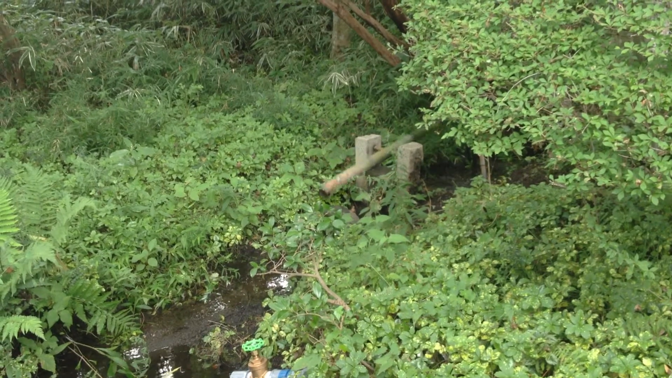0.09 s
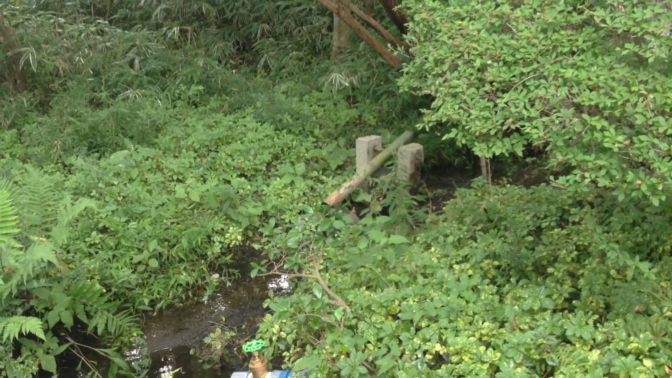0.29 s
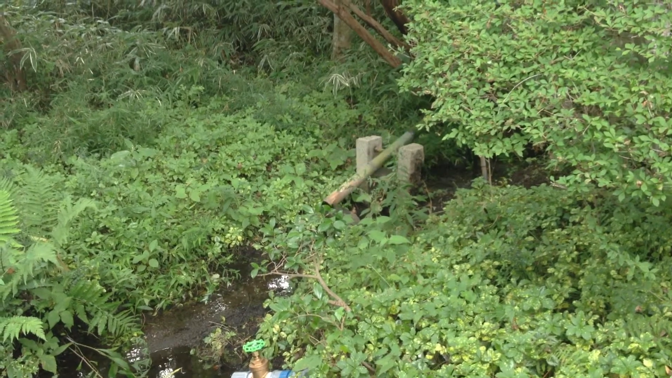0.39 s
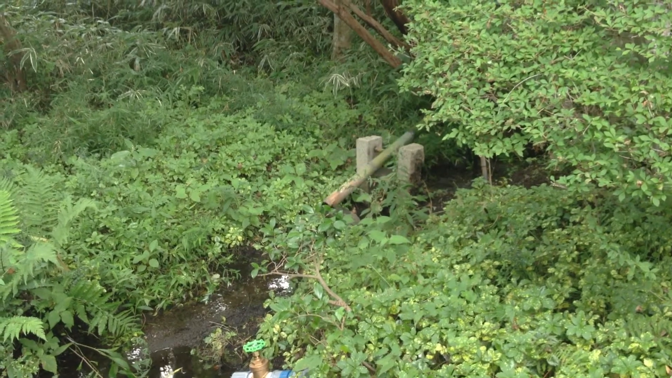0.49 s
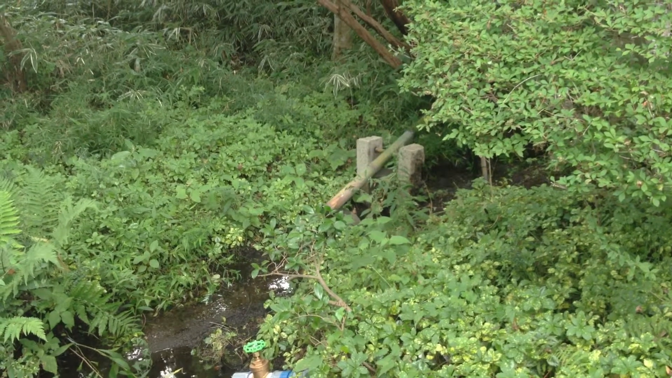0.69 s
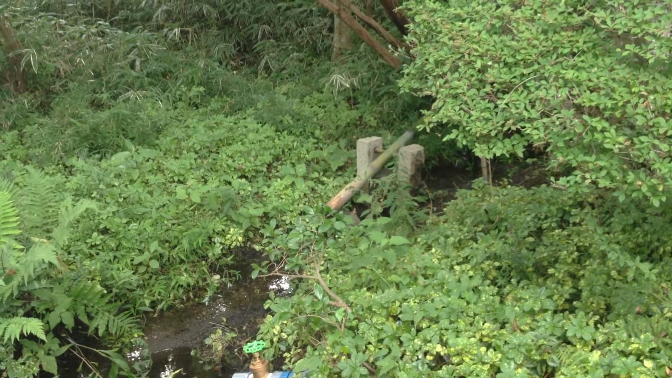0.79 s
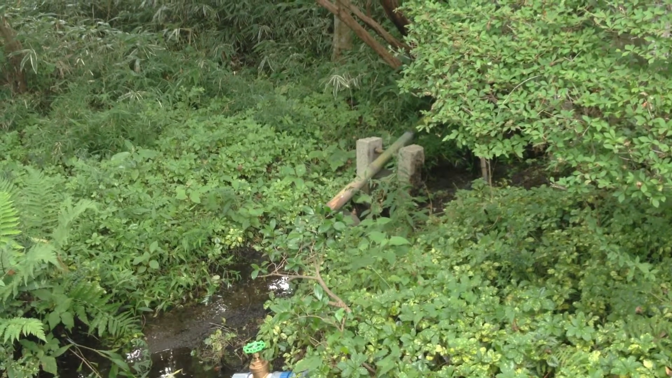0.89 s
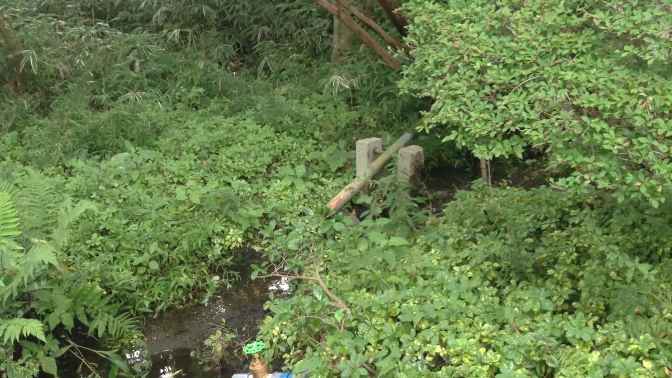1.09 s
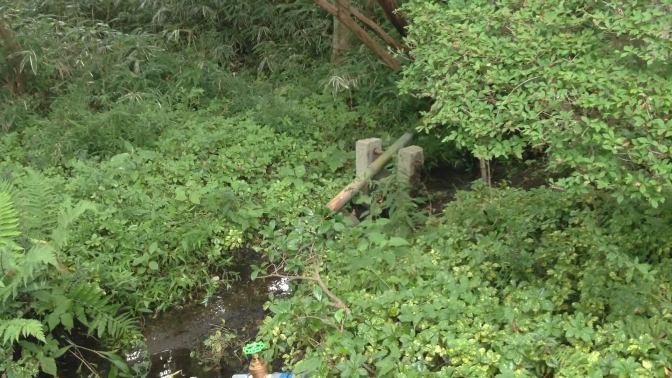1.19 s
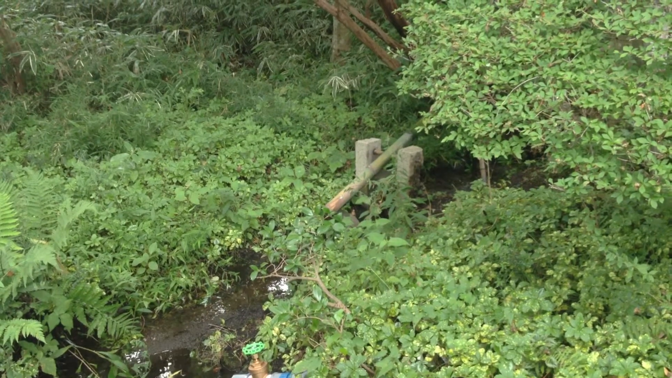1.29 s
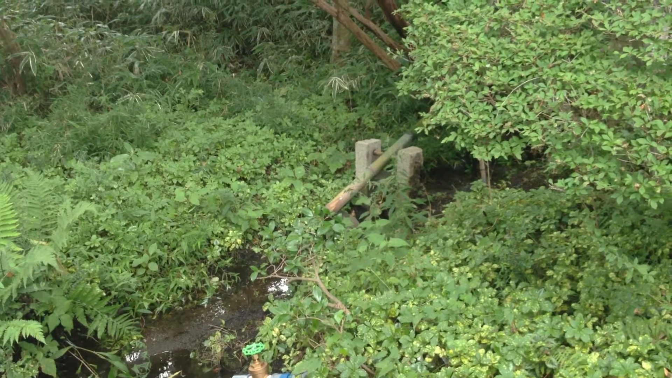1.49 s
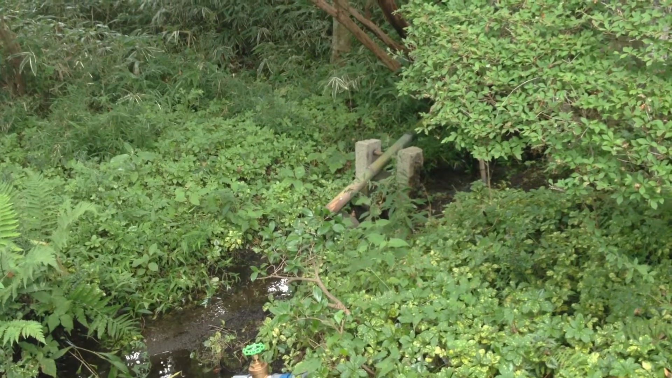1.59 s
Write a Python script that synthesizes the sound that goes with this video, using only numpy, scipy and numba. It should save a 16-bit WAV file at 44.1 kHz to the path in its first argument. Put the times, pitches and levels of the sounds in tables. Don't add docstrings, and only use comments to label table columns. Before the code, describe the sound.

A hollow bamboo tube strikes stone at about 0.25 seconds: a bright, cracking, woody clack of several contacts within 0.03 seconds, with short ringing and dull echoes from banks and leaves. A much softer bounce patters around 0.67-0.72 seconds. Throughout, a raspy cicada slides up and down in pitch about three times in a quarter second, over distant insect hiss, faint trickling and small drips, clearest near 0.57.

```python
import sys
import numpy as np
from scipy import signal
from scipy.io import wavfile
from scipy.ndimage import uniform_filter1d
from numba import njit

SR = 44100
rng = np.random.default_rng(int(sys.argv[2]) if len(sys.argv) > 2 else 0)


def boost(x):
    u = np.asarray(x, float) / 20
    return 10 ** u


def waveform_to_disk(signal):
    frames = np.transpose(np.atleast_2d(signal))
    scaled = np.clip(frames, -1, 1) * 32767
    samples = np.round(scaled).astype(np.int16)
    wavfile.write(sys.argv[1], SR, samples)


N = 70560


@njit
def moving_band(x, hz, width):
    y, band_state, low_state = np.empty(len(x)), 0., 0.
    for i in range(len(x)):
        w = 2 * np.pi * hz[i] / SR
        g = np.tan(w / 2)
        k = 2 * np.pi * width / SR / np.sin(w)
        v = (band_state + g * (x[i] - low_state)) / (1 + g * (g + k))
        band_state = 2 * v - band_state
        low_state = low_state + 2 * g * v
        y[i] = k * v
    return y


def band(x, hz, width, count=1):
    for _ in range(count):
        x = moving_band(x + 1e-18, hz + np.zeros(len(x)), float(width))
    return x


def noise_band(hz, width, count):
    return unit(band(rng.standard_normal(N), hz, width, count))


def unit(x):
    return x / np.sqrt(np.mean(x ** 2))


def unit_energy(x):
    return x / np.sqrt(np.sum(x ** 2))


def fade(t, t60):
    return np.exp(-np.log(1000) * t / t60)


def walk(rate):
    hold = int(SR / rate)
    steps = np.repeat(rng.standard_normal(N // hold + 1), hold)
    smooth = uniform_filter1d(uniform_filter1d(steps, hold), hold)
    return unit(smooth[:N])


def add(out, x, s):
    i = int(s * SR)
    out[i:i + len(x)] += x[:len(out) - i]


# (frequency [Hz], level [dB], t60 [s])
BAMBOO_MODES = [(243.8, -17.5, 0.74), (396.9, -14.5, 0.23), (606.3, -2.5, 0.044), (739, -13, 0.32),
                (1058, -1, 0.074), (1194, -0.5, 0.066), (1284, 0, 0.059), (1407, -4, 0.049),
                (1732, -2, 0.056), (2180, 1, 0.046), (2277, -1.5, 0.043), (2552, -2.5, .04),
                (2878, -9, 0.06), (3308, -8, 0.04)]


def bamboo_ring(t, hollow_db):
    hz, db, t60 = np.array(BAMBOO_MODES).T[:, :, None]
    level_luck, pitch_luck = rng.standard_normal((2, len(hz), 1))
    level = boost(db + 2.5 * level_luck + hollow_db * (hz < 1100))
    pitch = hz * (1 + .015 * pitch_luck * (t60 < .15))
    return (level * fade(t, t60) * np.sin(2 * np.pi * pitch * t)).sum(axis=0) / 3


# (frequency [Hz], width [Hz], level [dB])
CRACK_BANDS = [(1530, 2200, 7), (3600, 1100, 0.5), (6720, 1330, 3.5), (11900, 7000, -6)]


def cane_crack(t):
    hiss = rng.standard_normal(len(t))
    crack = sum(boost(db) * unit(band(hiss, hz, width, count=2)) for hz, width, db in CRACK_BANDS) / 3
    rise_s, t60_s = 0.0013, 0.049
    return crack * fade(t, t60_s) * (1 - np.exp(-t / rise_s))


# (time [s], level [dB], crack level [dB], hollow low modes [dB])
CONTACTS = [(.2465, -14, 0, 0.5), (.2485, -15, -2, 3), (0.2501, -6, -24, -0.5), (0.2547, -14.5, 7, -2),
            (.2605, -10.5, -11.5, 1.5), (.2665, -13, -13, 0), (.2725, -22.5, -12, 6),
            (.6735, -23, -22, 5.5), (.6768, -32.5, -31, 5.5), (.686, -52, -13, -3), (.696, -27.5, -7, 1),
            (.707, -33, -14, 3.5), (0.717, -41, -20, 8)]


def tube():
    out, t = np.zeros(N), np.arange(SR // 2) / SR
    thud_hz, thud_db, thud_t60_s, push_s = 212, -27.5, 0.022, .0004
    thud = boost(thud_db) * fade(t, thud_t60_s) * np.sin(2 * np.pi * thud_hz * t)
    for s, level_db, crack_db, hollow_db in CONTACTS:
        knock = bamboo_ring(t, hollow_db) + boost(crack_db) * cane_crack(t) + thud
        add(out, boost(level_db) * knock * (1 - np.exp(-t / push_s)), s)
    return out


# (delay [s], level [dB], smear [s], top frequency [Hz])
ECHOES = [(0.0459, -19.5, 0.0022, 6600), (0.109, -26.5, 0.0011, 2240), (0.0589, -28, 0.0033, 2050),
          (0.131, -34, 0.0059, 2640)]
# (frequency [Hz], level [dB], t60 [s])
FOLIAGE = [(300, -13.5, 0.73), (1000, -28.5, .3), (2550, -13.5, 0.42), (6250, -14, 0.27), (12000, -7.5, .2)]


def surroundings(x):
    t = np.arange(SR // 2) / SR
    response = (t == 0) * 1.
    for delay, db, smear, top_hz in ECHOES:
        clump = band(rng.standard_normal(len(t)), top_hz / 2, top_hz)
        clump = clump * np.exp(-.5 * ((t - delay) / smear) ** 2)
        response = response + boost(db) * unit_energy(clump)
    for hz, db, t60 in FOLIAGE:
        tail = band(rng.standard_normal(len(t)), hz, hz)
        tail = tail * fade(t, t60) * (1 - np.exp(-t / .004))
        bandwidth_gain = np.sqrt(hz / SR * np.pi)
        response = response + boost(db) * unit_energy(tail) * bandwidth_gain
    return signal.fftconvolve(x, response)[:N]


# (time [s], count [strokes])
STROKES = [(-.048, -1), (.041, 0), (.219, 2), (.483, 5), (.566, 6), (.823, 9), (1.075, 12), (1.161, 13),
           (1.336, 15), (1.417, 16), (1.673, 19)]


def belly_stretch():
    rise, hold, fall, lead = 0.413, 0.265, 0.162, 0.264
    stroke = (np.interp(np.arange(N) / SR, *np.array(STROKES).T) + lead) % 1
    stretch = np.interp(stroke, np.cumsum([0, rise, hold, fall]), [0, 1, 1, 0])
    return .5 - .5 * np.cos(np.pi * stretch)


def tymbal_clicks():
    rate_hz, phase, weak_db, scatter_db, jitter_s = 301, .1, -4, 3, .00006
    k = np.arange(1, int(N / SR * rate_hz) - 1)
    time_luck, level_luck = rng.standard_normal((len(k), 2)).T
    times = (k - phase) / rate_hz + jitter_s * time_luck
    clicks = np.zeros(N)
    clicks[(times * SR).astype(int)] = boost(weak_db * (k % 2) + scatter_db * level_luck)
    return clicks


# (relaxed [Hz], stretched [Hz], width [Hz], relaxed level [dB], stretched level [dB])
CICADA_RESONANCES = [(6020, 7450, 450, -54.5, -57), (6190, 6450, 1400, -55.5, -56.5),
                     (11570, 14640, 940, -65.5, -54), (11550, 12000, 1400, -63, -62.5),
                     (15500, 13100, 2200, -66, -62)]


def cicada():
    stretch, clicks = belly_stretch(), tymbal_clicks()
    rattle_s = .0007
    rattle = signal.lfilter([1], [1, -np.exp(-1 / (rattle_s * SR))], clicks)
    out = 0
    for low_hz, high_hz, width, low_db, high_db in CICADA_RESONANCES:
        drive = unit(clicks) + unit(rattle * rng.standard_normal(N))
        hz = low_hz + (high_hz - low_hz) * stretch
        level = boost(low_db + (high_db - low_db) * stretch)
        out = out + level * unit(band(drive, hz, width, count=2))
    return out


def cicada_in_leaves():
    t = np.arange(SR // 10) / SR
    tail = unit_energy(rng.standard_normal(len(t)) * fade(t, 0.17))
    song = cicada()
    song = song + boost(-0.5) * signal.fftconvolve(song, tail)[:N]
    out = 0
    for edges_hz in [(5150, 8250), (10600, 17000)]:
        out = out + signal.sosfilt(signal.cheby1(5, 1, edges_hz, "band", fs=SR, output="sos"), song)
    return out


# (frequency [Hz], width [Hz], level [dB], flicker [dB])
CHORUS_BANDS = [(5394, 540, -66, 4.5), (6180, 2000, -55.5, -1), (7530, 1100, -61.5, 3.5),
                (2450, 400, -71.5, 2), (12960, 4500, -59, 3), (9850, 3700, -73, 1.5)]


def chorus():
    out = 0
    for hz, width, db, flicker_db in CHORUS_BANDS:
        out = out + boost(db + flicker_db * walk(37)) * noise_band(hz, width, count=4)
    return out


# (time [s], frequency [Hz], level [dB], fade length [cycles])
DRIPS = [(.104, 741, -45.5, 15), (.146, 780, -50, 12), (.158, 4700, -48, 30), (.573, 3020, -33, 4.8),
         (.576, 2180, -51, 22), (.652, 2450, -44, 15.4), (1.077, 1850, -50, 17), (1.243, 3830, -52.5, 17),
         (1.275, 2450, -56.5, 70), (1.416, 4570, -49, 31), (1.476, 1100, -47.5, 12.6)]


def stream():
    out, t = np.zeros(N), np.arange(SR // 12) / SR
    trickle_db, spread_db, glide, rise_s = -71.5, 2, .06, 0.00067
    trickle = []
    for when, pitch, loudness, length in rng.random((150, 4)):
        db = trickle_db - spread_db * np.log(1 - loudness)
        trickle.append((when * N / SR, 300 * 2 ** (3.5 * pitch), db, 5 + 14 * length))
    for s, hz, db, cycles in list(DRIPS) + trickle:
        age = hz * t / cycles
        envelope = np.exp(-2.5 * age) * (1 - np.exp(-t / rise_s))
        tone = np.sin(2 * np.pi * hz * t * (1 + glide * age / 2))
        add(out, boost(db) * envelope * tone, s)
    return out


# (frequency [Hz], level per Hz [dB])
GARDEN_SPECTRUM = [(24, -59), (40, -6.5), (182, -2), (384, -7), (417, -7.5), (2470, -13.5), (4090, -14),
                   (5000, -8), (6500, -38), (11000, -120)]


def garden():
    out, (table_hz, table_db) = 0, np.array(GARDEN_SPECTRUM).T
    for hz in 45 * 2 ** np.arange(0, 7, .5):
        db = np.interp(np.log(hz), np.log(table_hz), table_db)
        db = db + 10 * np.log10(hz) + 2.5 * walk(9)
        out = out + boost(db) * noise_band(hz, hz / 2, count=2)
    return boost(-61) * (unit(out) + boost(-46) * noise_band(10000, 5000, count=1))


def scene():
    return (surroundings(tube()) + cicada_in_leaves() + chorus() + stream() + garden())[None]


def roll_off(x):
    return signal.sosfilt(signal.butter(12, 16140, fs=SR, output="sos"), x)


def record(dry):
    x = signal.sosfilt(signal.butter(4, 116, "high", fs=SR, output="sos"), dry)
    x = signal.sosfilt(signal.ellip(14, .3, 75, 15250, fs=SR, output="sos"), x)
    return roll_off(x)


dry = scene()
out = record(dry)
waveform_to_disk(out)
```